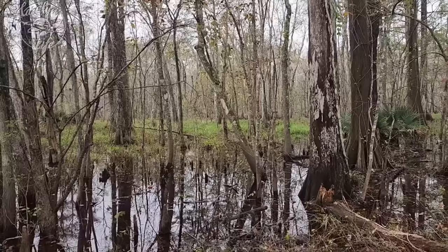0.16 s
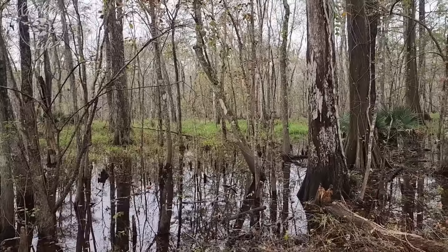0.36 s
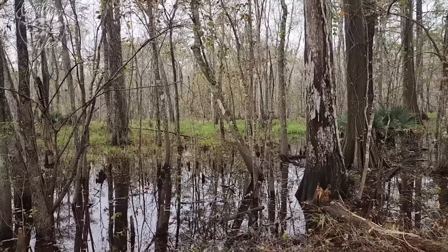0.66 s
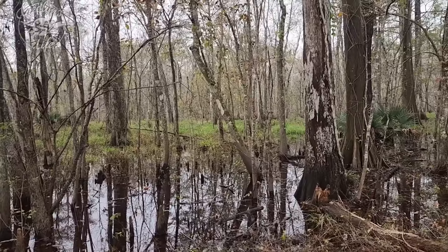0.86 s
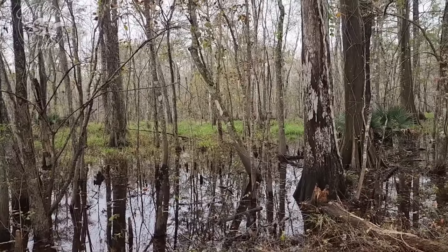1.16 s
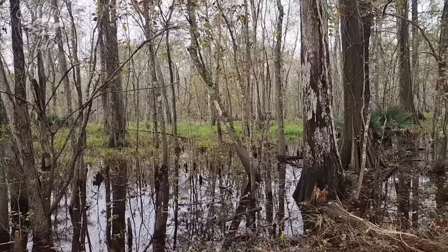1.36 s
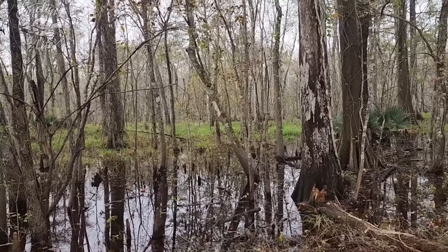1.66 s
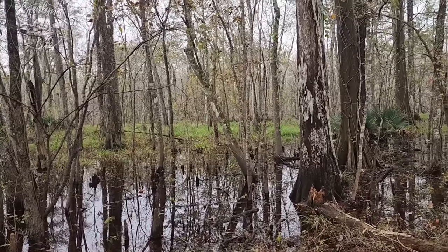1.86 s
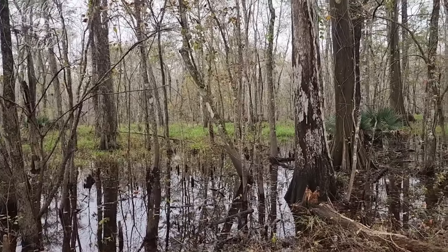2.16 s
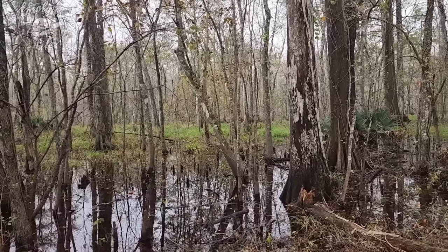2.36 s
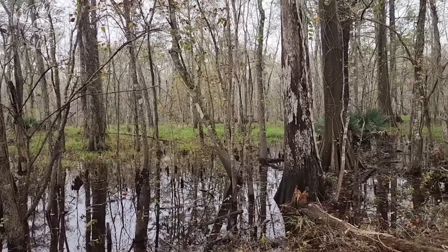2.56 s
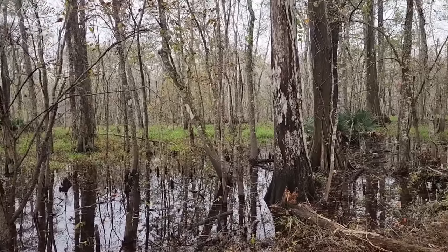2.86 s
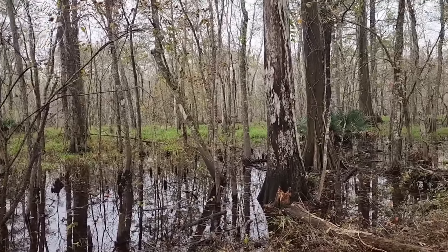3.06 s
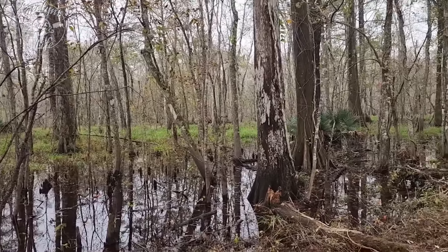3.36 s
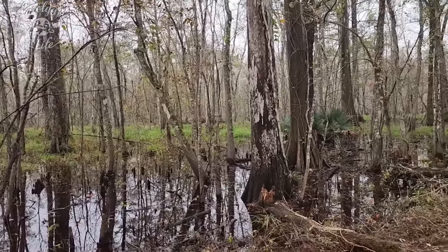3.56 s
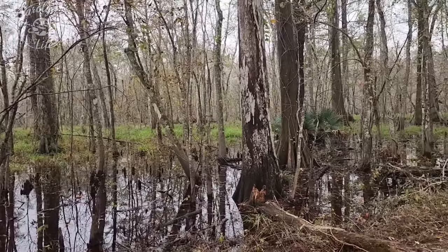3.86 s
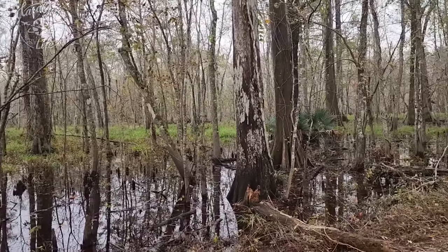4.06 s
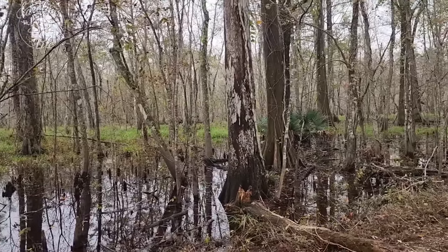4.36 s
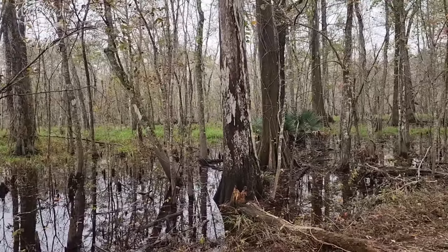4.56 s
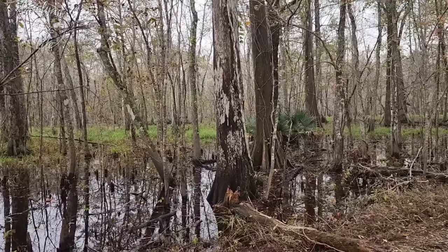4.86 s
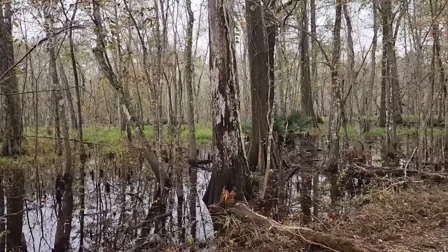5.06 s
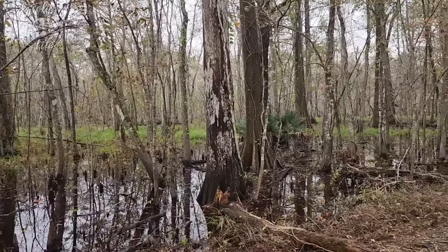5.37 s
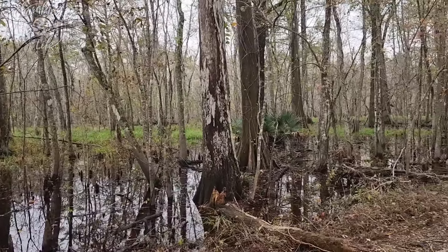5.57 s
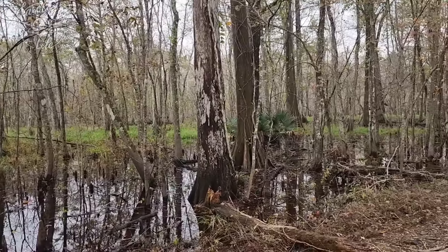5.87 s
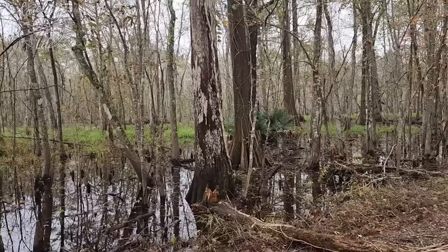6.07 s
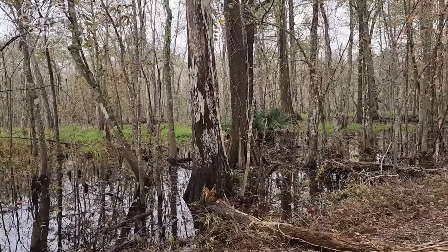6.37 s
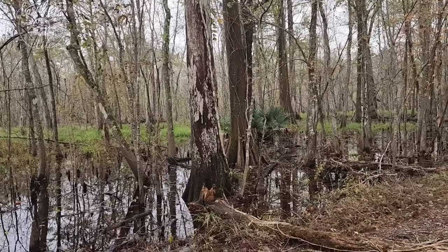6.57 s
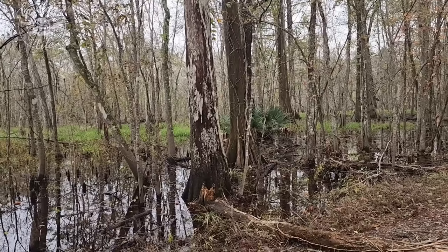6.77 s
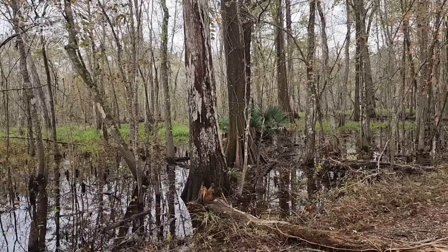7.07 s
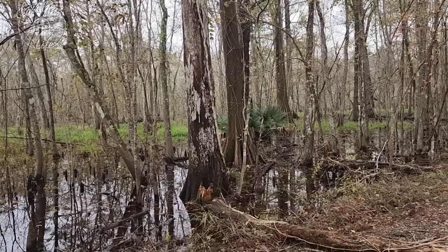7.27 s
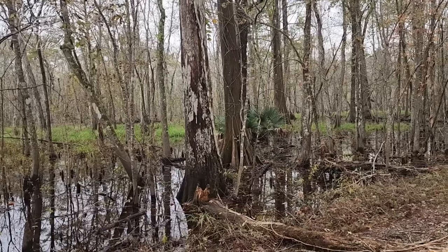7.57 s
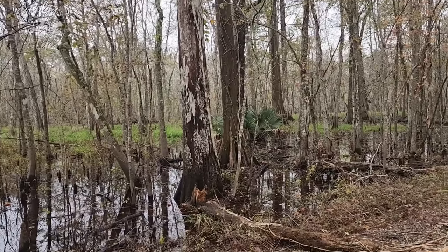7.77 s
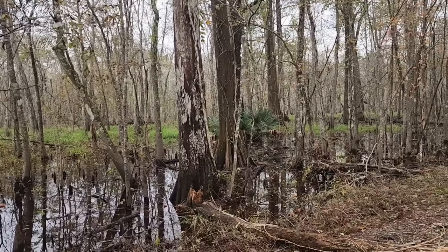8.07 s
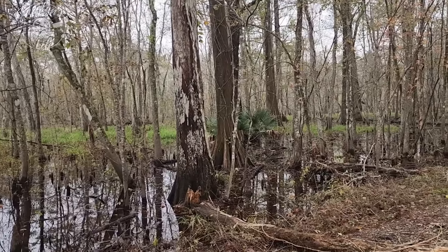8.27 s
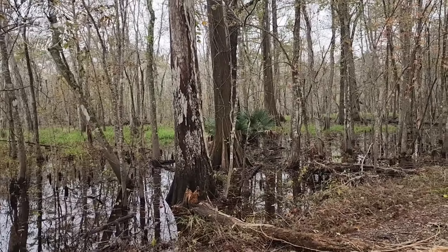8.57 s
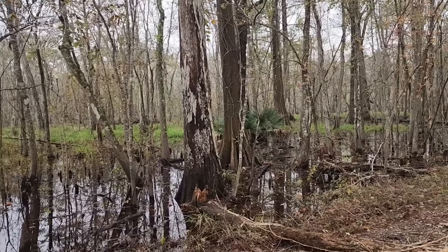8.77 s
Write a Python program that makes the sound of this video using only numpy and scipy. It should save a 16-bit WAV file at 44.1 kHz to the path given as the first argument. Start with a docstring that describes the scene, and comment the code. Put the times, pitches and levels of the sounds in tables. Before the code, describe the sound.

Small birds chirp and whistle in a swamp woodland over a steady, shrill insect chorus and a low rumble.

```python
"""Birds in a flooded woodland

Small birds chirp and whistle, echoing among the trunks, over a shrill chorus of insects.
A low rumble and a far engine's hum lie underneath; twigs crack now and then.
Near the end a rush of air sets in, with a quickening bird rattle and a few knocks on the camera."""
import sys
import numpy as np
from scipy import signal
from scipy.fft import rfft, irfft
from scipy.io import wavfile

SR = 44100
rng = np.random.default_rng(int(sys.argv[2]) if len(sys.argv) > 2 else 0)


def store_wav(level_fs):
    """Save 16-bit WAV to argv[1]."""
    pcm = np.round(np.clip(np.atleast_2d(level_fs), -1, 1) * 32767)
    wavfile.write(sys.argv[1], SR, pcm.T.astype(np.int16))


N = 393372
TIME = np.arange(N) / SR


def amp(db):
    """Turns decibels into a gain to multiply by."""
    return 10 ** (np.asarray(db) / 20)


def evened(x):
    """Scales a sound to an average (rms) level of 1."""
    return x / np.sqrt(np.mean(x ** 2) + 1e-20)


def read(points, hz):
    """Looks up frequencies in a table, blending between rows on a log scale."""
    f, value = np.transpose(points)
    return np.interp(np.log(hz + 1), np.log(f + 1), value)


def follow(rows):
    """Turns a table over time into one curve for each value column."""
    times, *columns = np.transpose(rows)
    return [np.interp(TIME, times, column) for column in columns]


def sides(side_db):
    """Left and right gains of constant power; a positive side is left, a negative one right."""
    pair = np.array([amp(side_db / 2), amp(-side_db / 2)]).reshape(2, -1)
    return pair / np.sqrt((pair ** 2).mean(0))


def add(mix, s, sound):
    """Mixes a sound in, starting at s seconds."""
    part = mix[:, max(round(s * SR), 0):][:, :sound.shape[-1]]
    part += sound[..., :part.shape[1]]


def drift(rate_hz, size=N):
    """A smooth random wobble, about 1 in size."""
    knots = rng.standard_normal(int(size / SR * rate_hz * 2) + 3)
    position = np.arange(size) / SR * rate_hz * 2
    return np.interp(position, np.arange(len(knots)), knots) * np.sqrt(3 / 2)


def scatter(from_s, to_s, low_hz, high_hz, count):
    """Random (time, frequency) pairs, loosely spaced over a stretch of time."""
    when, pitch = rng.random((count, 2)).T
    times = from_s + (to_s - from_s) * (np.arange(count) + when) / count
    return zip(times, low_hz * (high_hz / low_hz) ** pitch)


def noise(colour, side):
    """Stereo noise shaped by a colour table; the two ears agree most in the bass."""
    # how alike the ears are: f/Hz, likeness (1 or more = the same)
    likeness = [(60, 1.1), (130, 0.96), (290, 0.67), (640, 0.51), (1400, 0.05), (3000, -0.07), (15000, 0)]
    hz = np.fft.rfftfreq(N, 1 / SR)
    left, other = rfft(rng.standard_normal((2, N)))
    same = np.clip(read(likeness, hz), -1, 1)
    pair = np.array([left, same * left + np.sqrt(1 - same ** 2) * other])
    return evened(irfft(pair * amp(read(colour, hz)) * sides(read(side, hz)), N))


def reflect(x, echoes):
    """Plays a sound through a pattern of echoes scaled to an energy of 1."""
    echoes = echoes / np.linalg.norm(echoes, axis=1, keepdims=True)
    return signal.fftconvolve(x, echoes, axes=1)[:, :N]


def woods(x, near_db=3, near_decay_s=.011, gap_s=.0066, echoes_per_s=2500):
    """Trunks scatter the sound: a few near ones at once, then a long fading tail."""
    # time the echo takes to fade by 60 dB: f/Hz, fade/s
    fade_times = [(500, .58), (2500, 1.94), (4000, 1.96), (6500, 1.25), (8500, 0.34)]
    t = np.arange(SR) / SR
    echoes = rng.standard_normal((2, SR)) * (rng.random((2, SR)) < echoes_per_s / SR) * (t > gap_s)
    echoes *= 1 + amp(near_db) * np.exp(-t / near_decay_s)
    hz, frame_s, bands = signal.stft(echoes, SR, nperseg=256)
    fade = amp(-60 * frame_s / read(fade_times, hz)[:, None])
    return reflect(x, signal.istft(bands * fade, SR, nperseg=256)[1])


def thicket(x, share, decay_s=.012):
    """Twigs and water close to the path smear a share of the sound with quick echoes."""
    t = np.arange(SR // 16) / SR
    echoes = rng.standard_normal((2, len(t))) * np.exp(-t / decay_s)
    return np.sqrt(1 - share) * x + np.sqrt(share) * reflect(x, echoes)


def rumble():
    """A low, wavering rumble that grows near the end."""
    # colour of the rumble: f/Hz, relative level/dB
    colour = [(15, -28), (25, -15), (42, -3.5), (55, -3), (70, 3.5), (88, -4.5), (110, -3.5), (150, -14.5),
              (200, -17), (290, -22), (350, -25), (450, -37.5), (700, -80)]
    # its loudness: t/s, level/dB
    loudness = [(0, -46), (2.7, -47.5), (4.1, -45.5), (6.85, -45), (6.95, -38), (7.6, -40.5), (8, -38),
                (8.92, -39.5)]
    return noise(colour, side=[(60, .51), (300, 3.1)]) * amp(follow(loudness)[0] + drift(3))


def hiss(level_db=-61):
    """The faint, steady hiss of the air."""
    # colour of the hiss: f/Hz, relative level/dB
    colour = [(150, -7), (400, -6.5), (650, 0.5), (900, -6.5), (1400, -1.5), (2400, 0.5), (3100, 1.5),
              (3800, -8), (6000, -53), (6400, 9.5), (6800, -2.5), (7600, 3.5), (8600, -1.5), (9900, -0.5),
              (11000, -9.5), (15500, -14.5)]
    # its lean to the left: f/Hz, side/dB
    side = [(400, -2), (1300, -0.5), (2400, -4), (4400, -17), (7000, -18), (8500, 17), (10000, -3),
            (12000, 24)]
    return noise(colour, side) * amp(level_db)


def air_rush(gust_db=5, swell_db=3):
    """A late rush of air, with deep gusts that buffet each microphone on its own."""
    # colour of the rush: f/Hz, relative level/dB
    colour = [(140, -29), (200, -1), (270, -16), (410, -1), (520, 3.5), (640, 4), (800, 6), (950, -0.5),
              (1430, 8.5), (1850, 0), (2200, 6), (2550, 1.5), (3000, -3.5), (3700, -4), (6000, -16.5),
              (7400, -6), (9000, -15), (15000, -35)]
    # its lean to the left: f/Hz, side/dB
    side = [(200, -20), (400, 2), (1400, 3.5), (2300, -1.5), (3000, -4.5), (7000, 3), (9000, 20),
            (15000, 54)]
    # its loudness: t/s, level/dB
    loudness = [(6.89, -100), (6.91, -51.5), (7.2, -49), (8, -48), (8.92, -48.5)]
    # colour of the gusts: f/Hz, relative level/dB
    gust_colour = [(15, -9), (35, 12), (80, 0.5), (140, -3.5), (300, -23), (600, -76)]
    gusts = np.array([noise(gust_colour, side=[(60, 0)])[0] * amp(gust_db + swell_db * drift(1.4))
                      for ear in range(2)])
    return (noise(colour, side) + gusts * sides(12)) * amp(follow(loudness)[0])


def engine():
    """A far engine hums as it draws nearer; the tone an octave above fades at the end."""
    # the hum: t/s, f/Hz, level/dB, octave level/dB
    course = [(0, 126.4, -75, -62), (1.4, 128.6, -81, -62), (2.4, 132, -78, -64.5), (3.1, 132, -53, -68.5),
              (3.8, 135.3, -62.5, -72.5), (4.2, 137, -47, -74), (5.2, 138.1, -48.5, -65.5),
              (6.3, 138.4, -43.5, -73), (6.9, 138, -43.5, -67.5), (7.4, 137.5, -48.5, -62),
              (8.92, 139.2, -54, -96)]
    hz, db, octave_db = follow(course)
    phase = 2 * np.pi * np.cumsum(hz + .5 * drift(3)) / SR
    octave = amp(octave_db + 3 * drift(8.8)) * np.sin(2 * phase + 1.94 * drift(12))
    hum = amp(db + drift(4)) * np.sin(phase)
    return np.sqrt(2) * (hum + octave)


def far_ring(level_db=-71, swell_db=3):
    """Far-off insects or frogs merge into a thin ring that swells and fades."""
    # colour of the ring: f/Hz, relative level/dB
    colour = [(2000, -18), (2300, -11), (2700, -27), (3010, -18), (3110, -6), (3210, -14), (3600, -45)]
    return noise(colour, side=[(3000, 6.5)]) * amp(level_db + swell_db * drift(.97))


def insects(boost_db=3, flutter_db=.33, wing_hz=64.2, pulse_depth=.12):
    """Many insects merge into one shrill band; the wing strokes of the nearest pulse through it."""
    # colour of the chorus: f/Hz, relative level/dB
    colour = [(3000, -34), (3900, -20.5), (4200, -10.5), (4500, -2), (4650, -3.5), (4850, 2.5),
              (5020, -1.5), (5280, 2.5), (5500, -3.5), (5700, -16), (5950, -14), (7000, -56)]
    # its loudness before the boost: t/s, level/dB
    loudness = [(0, -49.3), (1.5, -49.7), (2.8, -50.2), (3.7, -50.5), (4.25, -49.3), (5, -49.8), (7.2, -50),
                (8.92, -49.5)]
    strokes = np.sin(2 * np.pi * np.cumsum(wing_hz + .78 * drift(1.94)) / SR)
    level = amp(follow(loudness)[0] + boost_db + flutter_db * drift(20))
    return noise(colour, side=[(5000, -6)]) * level * (1 + pulse_depth * strokes)


def rustles_and_chip(grain_db=3, side_db=-5, echo_db=-10):
    """Short grainy bursts of noise: twigs, litter, water, a hand on the camera and one bird chip."""
    # the louder bursts; the last is a brief, narrow bird chip near 3 kHz:
    # t/s, decay/s, centre f/Hz, width/octaves, level/dB
    loud = [(0.233, 0.018, 3000, 0.46, -46), (0.87, 0.063, 3340, 0.75, -47.5),
            (2.969, 0.022, 416, 0.31, -51), (3.149, 0.015, 216, 0.32, -44), (3.258, 0.026, 2790, 0.86, -40),
            (3.411, .022, 193, 0.28, -41), (4.32, 0.023, 700, 1.43, -47.5), (4.326, 0.014, 190, 0.52, -37),
            (4.926, 0.022, 447, 1.15, -53), (6.961, .046, 6900, 0.78, -55), (7.2, .091, 9000, 1, -61),
            (7.258, .023, 595, 0.56, -42), (7.312, 0.024, 480, .7, -36.5), (7.336, 0.023, 5140, 0.6, -39.5),
            (7.425, 0.026, 7500, 0.54, -46), (7.443, 0.01, 550, 0.54, -40), (8.418, .02, 3140, .22, -41)]
    faint = [(s, .03, hz, .4, -57.5)
             for s, hz in scatter(from_s=4.3, to_s=5.9, low_hz=350, high_hz=500, count=5)]
    out, t = np.zeros((2, N)), np.arange(SR // 2) / SR
    hz = np.fft.rfftfreq(len(t), 1 / SR) + 1
    for s, decay, centre_hz, octaves, db in loud + faint:
        grains = rng.standard_normal((2, len(t))) * amp(grain_db * drift(155, len(t)))
        band = np.exp(-(np.log2(hz / centre_hz) / octaves) ** 2 / 2)
        burst = evened(irfft(rfft(grains) * band, len(t)))
        swell = np.minimum(t / (.5 * decay), 1) * np.exp(-(t / decay) ** 2 / 2)
        add(out, s, amp(db) * burst * swell * sides(side_db))
    return out + amp(echo_db) * woods(out)


def knocks(click_s=.00091, ring_s=.021, ring_db=-25, hollow_hz=800, hollow_s=.00047, side_db=-9):
    """Each knock on the camera is a sharp click, a brief hollow ring in the housing and a dull thump."""
    # the knocks: t/s, click level/dB, treble relative to click/dB, thump level/dB, thump f/Hz
    hits = [(3.418, -63, -10, -30, 149), (7.265, -33, 6, -31, 260), (7.311, -19.5, -22, -23, 250),
            (7.328, -13, -32, -20, 290), (7.436, -36, 15, -60, 89.4), (7.446, -17, 1.5, -15.5, 101),
            (7.4779, -28.5, 11, -53, 200), (7.757, -39, 16.5, -72, 200), (8.013, -29, -12, -27, 170)]
    out, t = np.zeros((2, N)), np.arange(SR // 10) / SR
    fade = np.exp(-t / click_s) + amp(ring_db) * np.exp(-t / ring_s)
    hollow = np.sin(2 * np.pi * hollow_hz * t) * np.exp(-t / hollow_s)
    for s, db, treble_db, thump_db, thump_hz in hits:
        burst = rng.standard_normal((2, len(t))) * fade
        body = signal.lfilter(*signal.butter(1, 1800, fs=SR), burst)
        snap = signal.lfilter(*signal.butter(1, [5000, 10000], "band", fs=SR), burst)
        click = 2 * body + hollow + .5 * amp(treble_db) * snap
        cycles = thump_hz * t
        thump = np.sin(2 * np.pi * cycles) * np.exp(-cycles / .86)
        add(out, s, (amp(db) * click + amp(thump_db) * thump) * sides(side_db))
    return out


def whistle(length, first_hz, middle_hz, last_hz, waver=.0093, bend=.67):
    """A bird's note glides through three pitches; a bend below 1 hurries its start."""
    progress = np.linspace(0, 1, max(int(length * SR), 16))
    size = len(progress)
    curve = np.polyfit([0, .5 ** bend, 1], [first_hz, middle_hz, last_hz], 2)
    hz = np.polyval(curve, progress ** bend)
    rasp = .1 * (first_hz > 1.2 * last_hz)  # steeply falling notes are hoarse
    hz *= 1 + waver * drift(197, size) + rasp * drift(468, size)
    return np.sqrt(2) * np.sin(2 * np.pi * np.cumsum(hz) / SR) * signal.windows.tukey(size, .5)


def perched(notes, smear=.15, echo_side_db=-4):
    """Places notes among the trees; each is t/s, sound, level/dB, side/dB, relative echo/dB."""
    direct, scattered = np.zeros((2, 2, N))
    for s, note, db, side_db, echo_db in notes:
        add(direct, s, amp(db) * note * sides(side_db))
        add(scattered, s, amp(db + echo_db) * note * sides(echo_side_db))
    return thicket(direct, share=smear) + woods(scattered)


def distance_echo_db(db, near_db=-45.5):
    """Fainter birds are farther away, so more of their sound is echo."""
    return .53 * (near_db - db)


def far_calls():
    """Harsh far-off calls that arrive only as echo; at the very start a faint echo of the song still lingers."""
    # the calls: t/s, length/s, f/Hz, level/dB; the first row is the song's lingering echo at the start
    calls = [(0, 0.082, 3410, -56), (3.881, 0.079, 1246, -67), (5.25, 0.1, 1150, -63.5),
             (5.326, 0.12, 1468, -58), (5.454, 0.059, 1310, -65), (6.54, 0.062, 1214, -66)]
    out = np.zeros((2, N))
    for s, length, hz, db in calls:
        add(out, s, amp(db) * whistle(length, hz, hz, hz, waver=.102))
    return woods(out, near_db=17)


def hooks():
    """Thin bird notes that shoot up and level off."""
    # the calls: t/s, length/s, top f/Hz, level/dB, side/dB
    calls = [(0, 0.018, 8200, -48.5, 0), (0.079, 0.044, 7570, -45, -3), (0.176, 0.035, 6900, -50, -9),
             (.256, 0.027, 6620, -48, -4), (.337, 0.025, 6550, -48.5, -11), (2.139, 0.024, 7860, -40.5, 9),
             (2.32, 0.088, 8320, -77, 4), (2.78, 0.15, 8300, -79, 9), (3.457, 0.14, 8020, -96.5, -10),
             (4.838, 0.093, 8320, -57.5, 6), (4.991, 0.083, 8100, -54.5, 0), (5.157, 0.028, 7820, -35, -3),
             (5.302, 0.035, 7400, -54, -4), (5.599, 0.095, 7990, -53.5, 1), (5.752, .096, 7880, -46.5, 5),
             (5.904, 0.034, 7050, -46.5, -12), (5.984, 0.038, 6680, -50, -7),
             (6.068, 0.034, 6620, -48, -12), (6.491, 0.022, 7680, -32, -5), (8.367, .076, 8400, -56, 9),
             (8.484, .027, 7900, -31, 1.5), (8.738, 0.06, 7950, -59.5, -1)]
    far_flock = [(s, .07, hz, -68, -5)
                 for s, hz in scatter(from_s=2.4, to_s=3.1, low_hz=7450, high_hz=8520, count=5)]
    notes = []
    for s, length, hz, db, side_db in calls + far_flock:
        note = whistle(length, .76 * hz, .97 * hz, hz, bend=.45)
        notes.append((s, note, db, side_db, distance_echo_db(db) + 2))
    return perched(notes, smear=.31, echo_side_db=-4.5)


def flicks(start_hz=5820, hz_per_s=72000, side_db=-12):
    """Chirps that sweep straight up: the higher one reaches, the longer it lasts."""
    # the chirps: t/s, top f/Hz, level/dB
    calls = [(.326, 9300, -60), (.524, 8900, -56), (1.588, 6500, -52), (1.645, 7850, -62),
             (1.722, 7700, -56), (1.795, 6900, -66), (1.918, 6940, -43), (2.193, 6770, -42),
             (3.7, 8850, -57), (4.981, 6400, -48), (5.862, 7640, -59), (5.94, 7800, -50),
             (6.113, 8360, -47), (6.139, 6800, -37.5), (6.413, 6800, -38.5), (7.181, 8500, -50),
             (7.556, 8400, -53.5)]
    notes = []
    for s, hz, db in calls:
        note = whistle((hz - start_hz) / hz_per_s, start_hz, (start_hz + hz) / 2, hz, bend=1)
        notes.append((s, note, db, side_db, distance_echo_db(db) - 1))
    return perched(notes)


def chips(length_s=.019, fall=.14, side_db=-9, echo_db=-7):
    """Short hoarse bird notes that fall steeply, from deep in the brush."""
    # the calls: t/s, middle f/Hz, level/dB
    calls = [(1.363, 7300, -60), (1.73, 2730, -47.5), (1.846, 3640, -46.5), (2.215, 3950, -58),
             (2.701, 2850, -55.5), (2.954, 3700, -48), (3, 3520, -46.5), (3.18, 2630, -56),
             (3.245, 3650, -48.5), (3.385, 2720, -54), (4.076, 3590, -55), (4.121, 2730, -50),
             (5.913, 2900, -47.5)]
    notes = []
    for s, hz, db in calls:
        note = whistle(length_s, hz * (1 + fall), hz, hz * (1 - fall), waver=.067)
        notes.append((s, note, db, side_db, echo_db))
    return perched(notes, smear=.95)


def slurs(overshoot=.36, side_db=-13):
    """Lower, clean whistles that slide to their pitch and a little beyond."""
    # the whistles: t/s, length/s, f/Hz, scoop (share it starts below f), level/dB, relative echo/dB
    calls = [(0.787, .2, 4230, .01, -53, -15), (1.298, 0.12, 3078, -0.021, -65, 0),
             (1.973, 0.041, 3820, 0.14, -45.5, -6.5), (2.254, .11, 2680, 0.086, -54.5, -15),
             (4.174, 0.049, 3620, -0.105, -53, -3.5), (6.202, 0.021, 3830, 0.12, -43.5, -2.5),
             (6.374, 0.032, 4010, .07, -50, -2), (6.478, 0.09, 2696, 0.085, -51.5, -11),
             (8.818, .037, 3860, .04, -46.5, -25)]
    notes = []
    for s, length, hz, scoop, db, echo_db in calls:
        note = whistle(length, hz * (1 - scoop), hz, hz * (1 + overshoot * scoop), waver=.0081)
        notes.append((s, note, db, side_db, echo_db))
    return perched(notes)


def song(side_db=-7, tree_line_s=.099, tree_line_db=-9):
    """One distant bird on the right repeats its phrase: a held note, an arch, a flick and a fall."""
    # notes of the phrase: t/s, length/s, first f/Hz, middle f/Hz, last f/Hz, relative level/dB
    phrase = [(-.018, .03, 2000, 2200, 2400, -17), (-.005, .1, 2410, 2455, 2435, -5.5),
              (.13, .058, 3500, 3810, 3250, -1), (.2, .03, 2920, 3070, 3090, -2),
              (.276, .04, 3050, 2550, 2100, -7)]
    # each time it is sung: t/s, level/dB
    repeats = [(.072, -44), (.517, -47), (4.468, -46), (4.897, -44), (5.337, -45)]
    clear, blurred = np.zeros((2, 2, N))
    for start, effort_db in repeats:
        for s, length, *pitches, db in phrase:
            gain = amp(effort_db + db) * sides(side_db)
            add(clear, start + s, gain * whistle(length, *pitches, waver=.005, bend=1))
            add(blurred, start + s, gain * whistle(length, *pitches, waver=.09))
    hazy_echo = woods(amp(-6) * clear + amp(-10) * blurred)
    out = amp(-2.5) * thicket(clear, share=.12) + hazy_echo
    # the trees across the water send the song back once more
    add(out, tree_line_s, amp(tree_line_db) * thicket(clear, share=1, decay_s=.1))
    return out


def rattle(pitch_hz=1230, drop=.19, level_db=-39.5, side_db=-7, echo_db=-9):
    """A bird's nasal notes quicken and brighten; each drops in pitch as its upper tones fade."""
    # the tones in one note: multiple of the pitch, relative level/dB, time it peaks early/s
    tones = [(2, 2, 0), (2, -13, 0.0167), (3, -10.5, 0.0076), (4, -10.5, 0.0035), (5, -14, 0.0103),
             (6, -10, 0.0096)]
    first_s, run_s, settle_notes = 7.1102, 7.2175, 11.5  # one lone note, then the run
    half_s, width_s = .03, .0036
    out, t = np.zeros((2, N)), np.arange(-half_s, half_s, 1 / SR)
    gaps = .05686 + .02604 * np.exp(-np.arange(24) / settle_notes)
    glide_hz = pitch_hz * (1 - drop / (1 + np.exp(-t / .0028)))
    for n, s in enumerate([first_s, run_s, *(run_s + np.cumsum(gaps))]):
        hz = glide_hz * (1 + .025 * drift(197, len(t)))
        phase = 2 * np.pi * np.cumsum(hz) / SR
        dull_db = -7 * np.exp(-2 * n / settle_notes)
        note = np.zeros(len(t))
        for multiple, db, early_s in tones:
            swell = np.exp(-((t + early_s) / width_s) ** 2 / 2)
            note += amp(db + dull_db * (multiple > 2)) * swell * np.sin(multiple * phase)
        gain = amp(level_db + .6 * rng.standard_normal())
        add(out, s + width_s / 2 - half_s, gain * note * sides(side_db))
    return out + amp(echo_db) * woods(out)


def scene():
    """Everything heard from the water's edge."""
    background = rumble() + hiss() + air_rush() + engine() + insects() + far_ring()
    birds = hooks() + flicks() + chips() + slurs() + song() + far_calls() + rattle()
    return background + birds + rustles_and_chip() + knocks()


def record(dry):
    """Cuts away the highest treble, above 15800 Hz."""
    low_pass = signal.firwin(511, 15800, window=("kaiser", 9), fs=SR)
    return signal.oaconvolve(dry, low_pass[None], "same")


dry = scene()
out = record(dry)
store_wav(out)
```